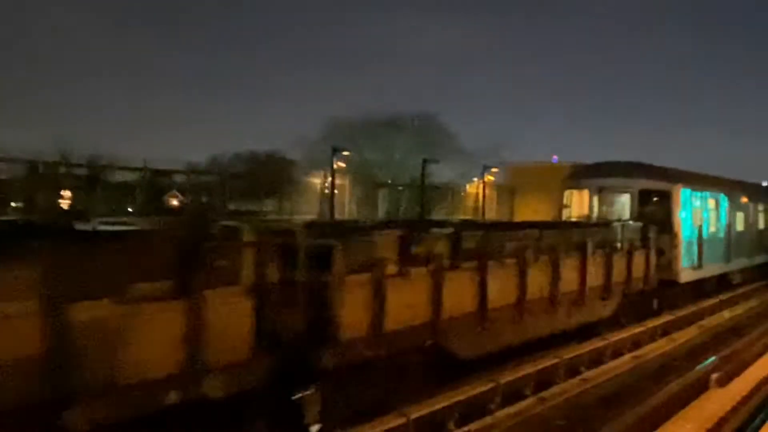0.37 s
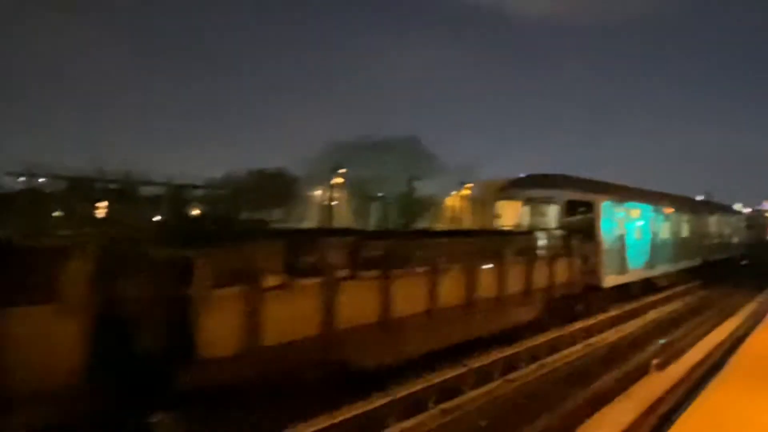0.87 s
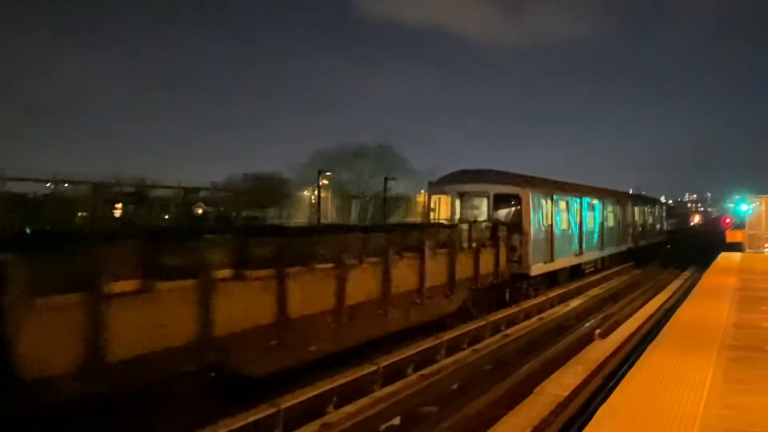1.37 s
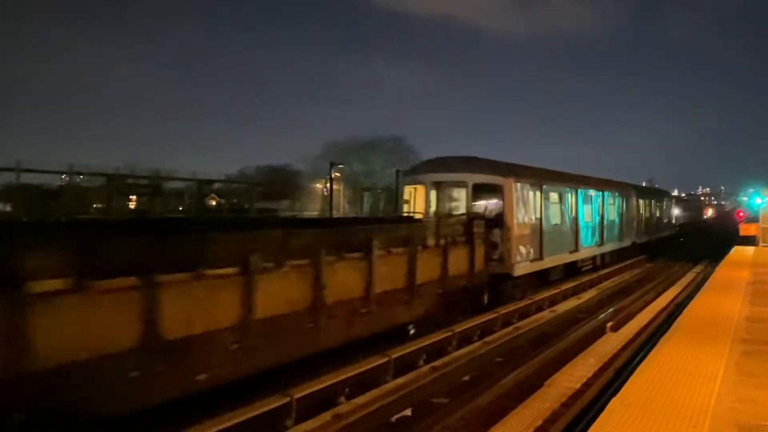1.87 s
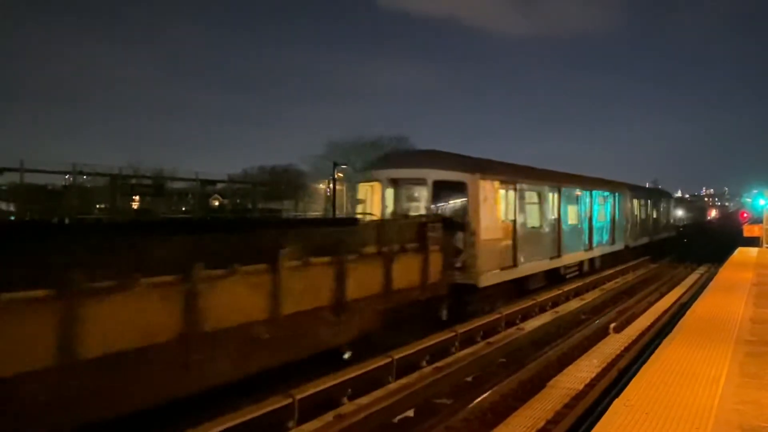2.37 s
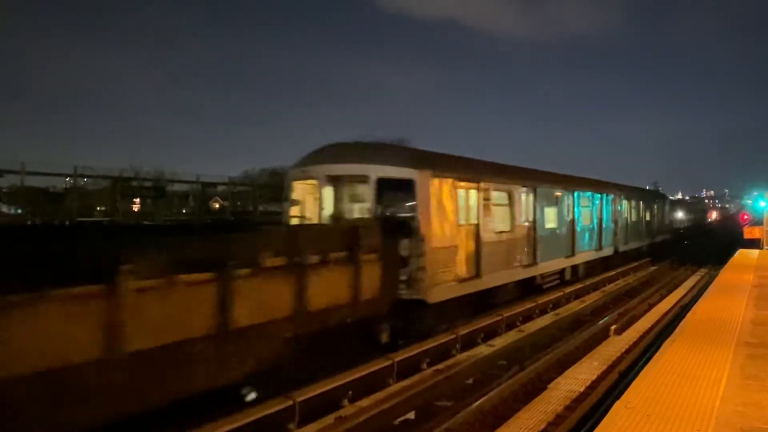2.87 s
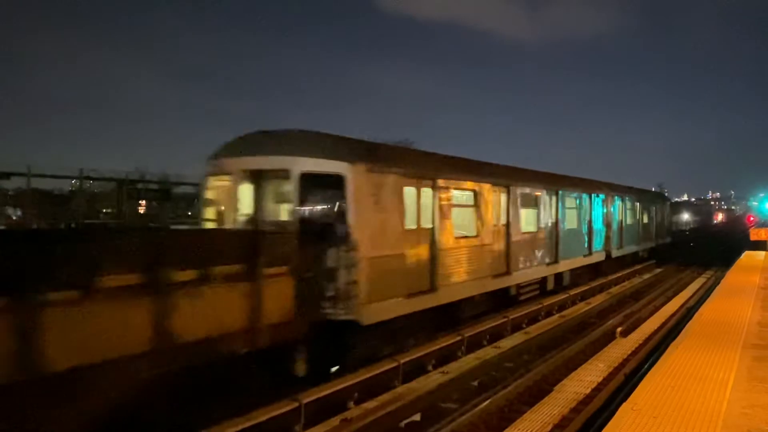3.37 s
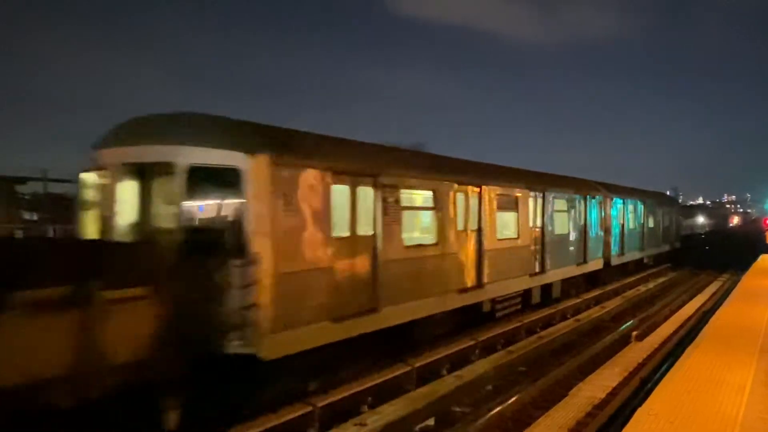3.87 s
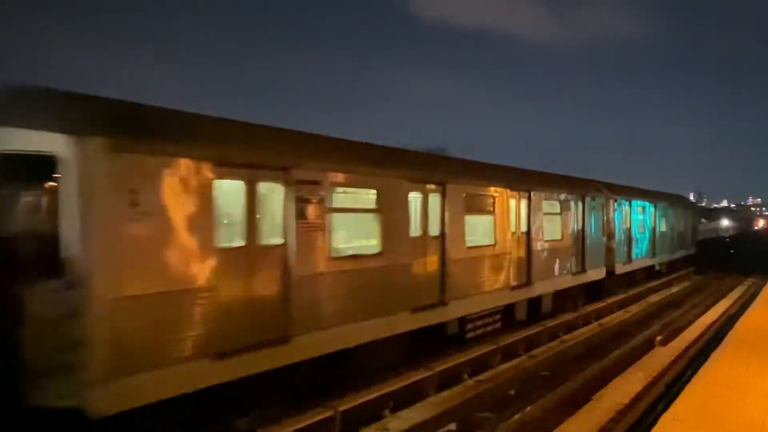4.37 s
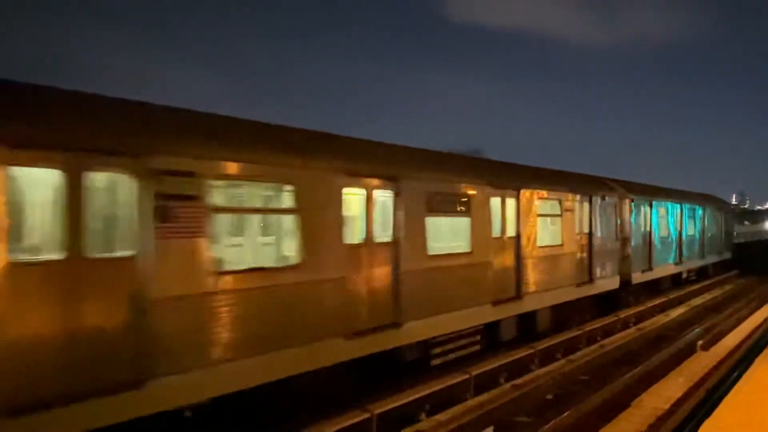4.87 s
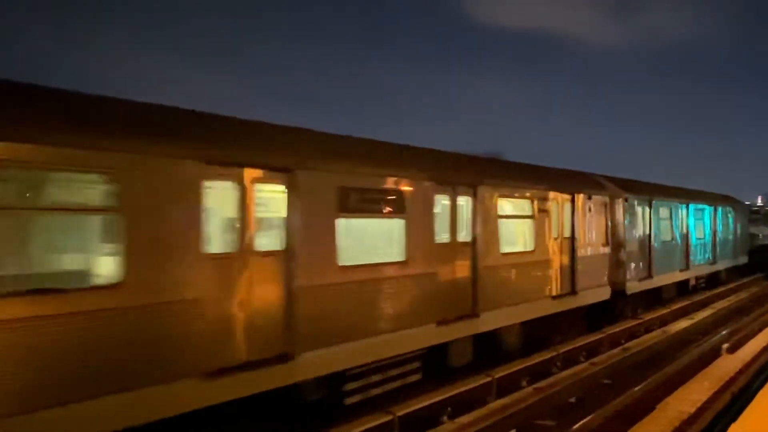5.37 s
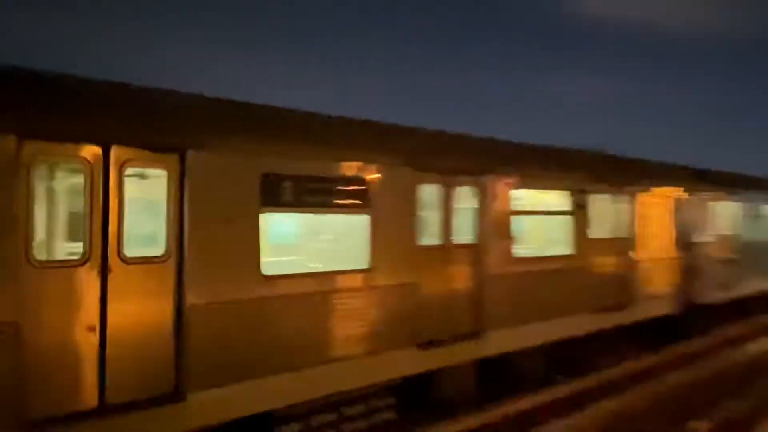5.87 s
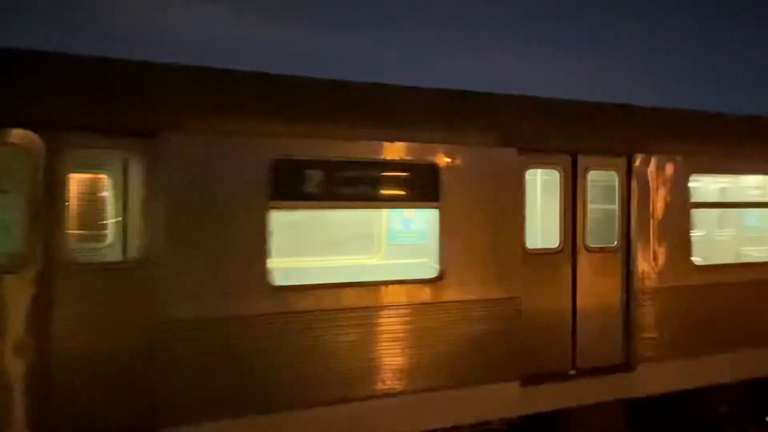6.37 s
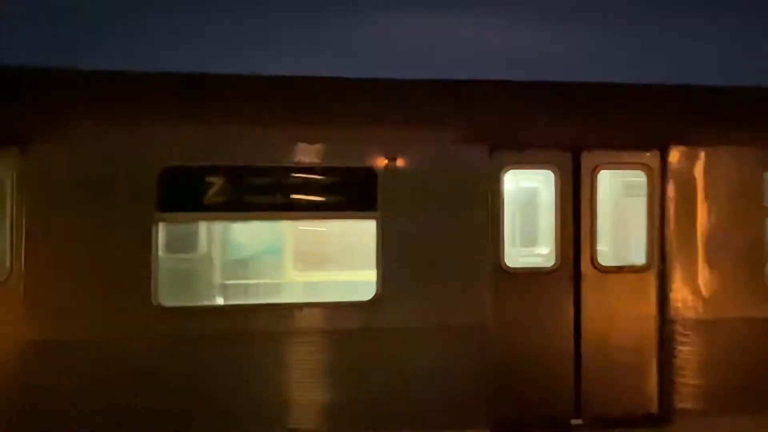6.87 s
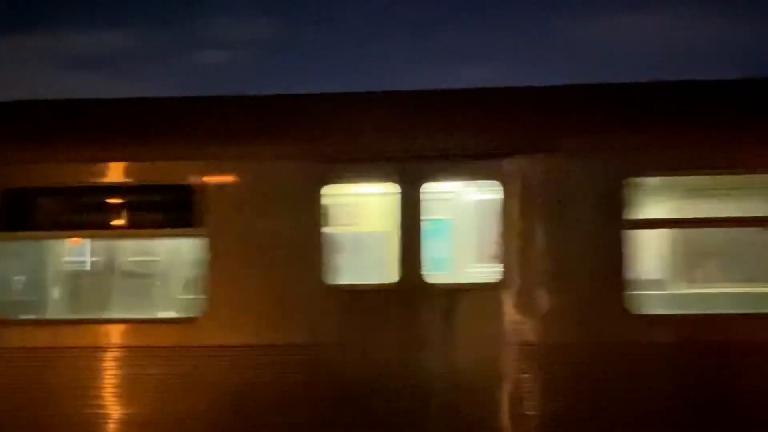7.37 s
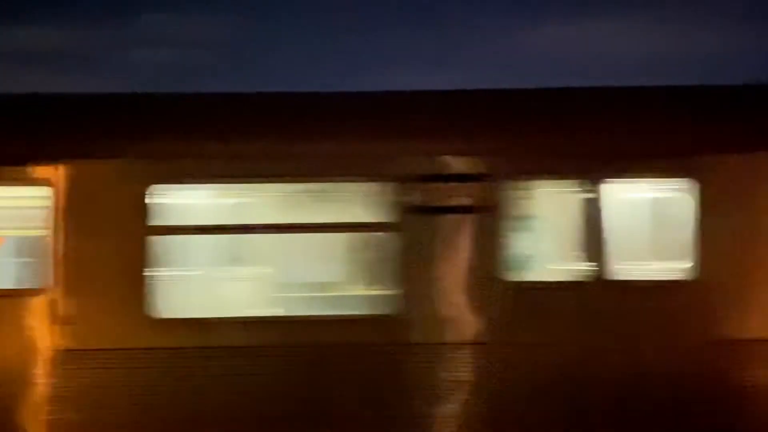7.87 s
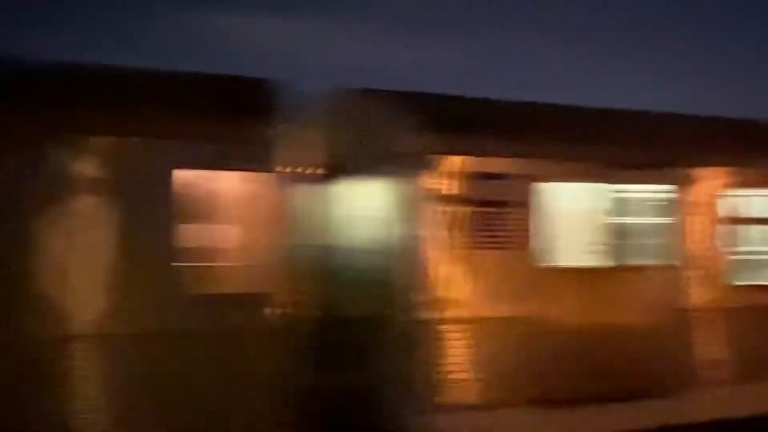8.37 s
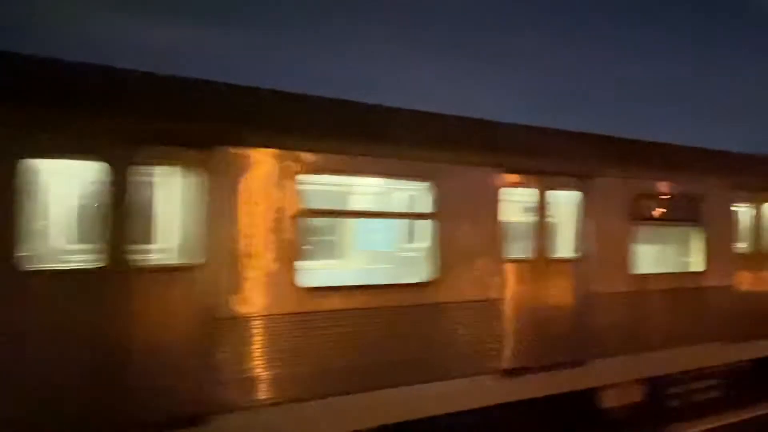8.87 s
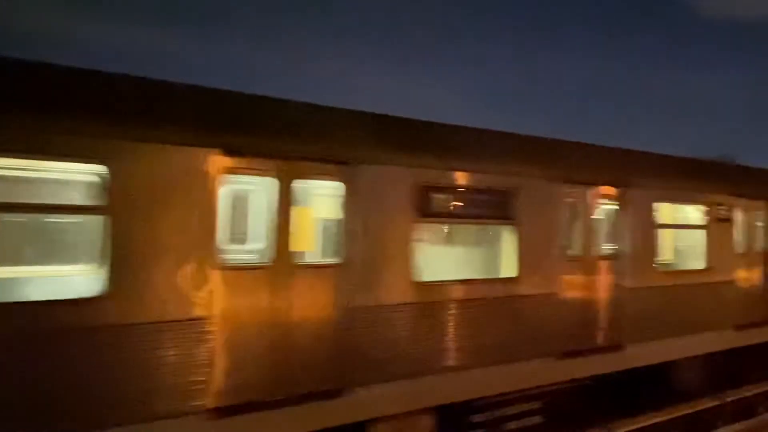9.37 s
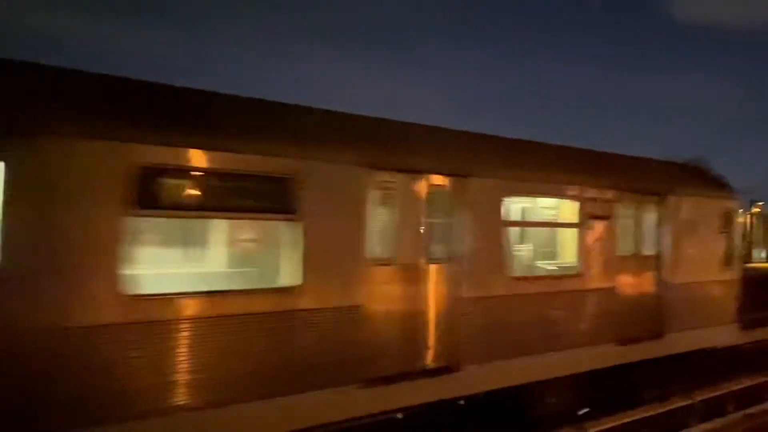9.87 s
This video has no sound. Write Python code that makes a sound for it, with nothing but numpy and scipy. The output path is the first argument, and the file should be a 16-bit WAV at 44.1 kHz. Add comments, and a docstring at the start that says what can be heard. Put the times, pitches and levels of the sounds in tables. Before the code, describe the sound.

A metro train passes an open elevated platform, heard from a handheld stereo microphone. Low girder rumble, mid-range rail roar and faint wheel hiss run throughout, gently swelling and easing. Axles strike rail joints in uneven clusters of thuds, knocks and short rattles that decay in the steelwork, with sharper ticks and very brief wheel chirps here and there. The train is still passing at the end.

```python
"""A steel-wheeled train rolls past on an elevated track, heard from the platform at a handheld pair of ports.
From the first moment to the last, girders rumble, rails roar and wheels hiss: filtered noise, slowly swelling.
From about 0.3 s on, axles crossing joints set off short clatters, noise that dies away in the steelwork and stirs
the rail web, with distinct knocks, clusters of decaying sines, among them. Now and then, from 0.36 to 9.3 s,
a struck wheel sings one brief wavering sine."""
import sys
import numpy as np
from scipy import signal
from scipy.fft import rfft, irfft, next_fast_len
from scipy.io import wavfile
from scipy.ndimage import uniform_filter1d, map_coordinates

SR = 44100
rng = np.random.default_rng(int(sys.argv[2]) if len(sys.argv) > 2 else 0)


def nominal_scale(level):
    """Amplitude ratio for a level in decibels (scalar or array-like)."""
    x = np.asarray(level, float) / 20
    return 10 ** x


def unload_wav(signal):
    """Save mono or channel-first audio to the path in sys.argv[1] as 16-bit WAV at rate SR, clipped to [-1, 1]."""
    wavfile.write(
        sys.argv[1],
        SR,
        np.round(np.clip(np.atleast_2d(signal).T, -1, 1) * 32767).astype(np.int16),
    )


N = 440559

# blows of axles on joints and of slack parts:
# (time [s], clatter level [dB], thud re clatter [dB], sizzle re clatter [dB])
BLOWS = [(.268, -18, 7.5, -29), (0.314, -13.5, 6, -26), (.34, -33, -8, -31), (.583, -23.5, 11, -29),
         (.641, -22.5, 6, -27), (.779, -15.5, 0.5, -25), (.838, -22, 10.5, -28), (1.093, -28, -8, -30),
         (1.212, -20.5, 8, -26), (1.279, -19, 3, -26), (1.349, -18.5, 8.5, -25), (1.543, -29, 19, -29),
         (1.627, -21.5, -9, -27), (1.69, -19, 1, -24), (1.807, -22, 1, -25), (1.859, -31, 13, -28),
         (2.008, -18.5, 5.5, -25), (2.059, -28, -2, -27), (2.305, -22.5, -2, -27), (2.424, -25, 4, -29),
         (2.595, -18, -10, -23), (2.679, -23.5, -20, -25), (2.898, -18.5, 5, -28), (2.959, -25, -7, -21),
         (3.297, -30, 19, -29), (3.34, -18.5, 7, -35), (3.362, -16.5, -6, -23), (3.41, -27, -10, -16),
         (3.525, -30, 10, -31), (3.665, -21, 11, -34), (3.68, -18.5, -10, -19), (3.729, -26, -7, -18),
         (3.84, -21.5, 8, -26), (4.215, -19, 8.5, -26), (4.236, -26, -1, -21), (4.36, -33, 19, -29),
         (4.424, -26.5, -1, -22), (4.62, -22, 9, -30), (4.7, -18.5, 5.5, -20.5), (4.797, -29, 9, -18),
         (5.03, -22, 7, -20), (5.093, -21.5, 1, -24), (5.589, -21, 6.5, -22), (5.65, -30, -2, -30),
         (5.969, -23, 12.5, -24), (5.993, -19.5, 2, -21), (6.06, -23.5, -12, -16), (6.31, -27.5, 13, -25),
         (6.53, -24, 14.5, -21), (6.87, -16.5, 5.5, -25), (6.909, -19, 4, -20), (6.957, -16, 7, -25),
         (6.979, -29, -2, -29), (7.02, -25, 10, -26), (7.151, -26, 2, -27), (7.298, -21, 8.5, -25),
         (7.346, -23, -5, -23), (7.399, -31, 4, -23), (7.757, -23.5, 6, -28), (7.834, -19, 10.5, -25),
         (8.06, -24.5, 6, -25), (8.174, -25, 11, -26), (8.256, -18, 9, -26), (8.328, -21, 6, -21),
         (8.407, -26, 9, -21), (8.697, -21, 9, -21), (8.806, -36, 3, -13), (9.257, -17.5, 7, -22.5),
         (9.329, -31, -10, -16), (9.594, -23.5, 6.5, -29), (9.675, -20, 9, -20), (9.73, -21.5, -17, -20)]


def along(points, hz):
    """Interpolation on a logarithmic frequency axis of (frequency [Hz], value) points."""
    f, v = np.transpose(points)
    return np.interp(np.log(hz + 1), np.log(f + 1), v)


def level_db(rows):
    """Linear interpolation in time: one dB value per sample for each column after the time."""
    s, *levels = np.transpose(rows)
    return [np.interp(np.arange(N) / SR, s, db) for db in levels]


def unit(x):
    """Normalization to an rms value of 1."""
    return x / np.sqrt(np.mean(x ** 2))


def wobble(rate):
    """Band-limited random modulation: a smooth curve through random knots, rate of them a second."""
    knots = rng.standard_normal(N // 100)
    return map_coordinates(knots, [np.arange(N) * rate / SR])


def filtered(x, response):
    """Linear filtering: the spectrum of x times a response of frequency."""
    m = next_fast_len(N + SR // 4)
    hz = np.fft.rfftfreq(m, 1 / SR)
    return irfft(rfft(x, m) * response(hz), m)[..., :N]


def rush(spectrum, grit_db, grit_rate):
    """Roughness excitation: two unrelated coloured noises, modulated alike by the bumps of the rail head."""
    bumps = nominal_scale(grit_db * wobble(grit_rate))
    rough = bumps * rng.standard_normal((2, N))
    return unit(filtered(rough, lambda hz: nominal_scale(along(spectrum, hz))))


def rolling():
    """Rolling noise: rough wheels on rough rails shake girders, rails and wheel discs, each swelling on its own."""
    # rolling noise: (time [s], girder rumble [dB], rail roar [dB])
    roll_levels = [(0, -9, -22), (.5, -17.5, -21), (.85, -13, -22), (1.3, -13.5, -20.5),
                   (1.85, -10.5, -17.5), (2.3, -13.5, -21), (2.9, -11, -19.5), (3.3, -11.5, -23),
                   (3.7, -15.5, -22), (3.87, -11, -21.5), (4.1, -13.5, -23), (5.2, -15, -22),
                   (6.2, -16.5, -20.5), (6.7, -16, -24), (7.3, -13.5, -20.5), (7.65, -17, -23),
                   (8.4, -15.5, -22), (9, -16, -25), (9.5, -18, -22.5), (9.99, -15, -25.5)]
    # rolling noise between blows: (time [s], rail web whoosh [dB], wheel hiss [dB])
    whoosh_levels = [(0, -29.5, -37), (.3, -40, -44.5), (.8, -30.5, -39), (1.15, -35.5, -40),
                     (1.83, -28.5, -37), (2.17, -33, -40.5), (2.95, -32, -40), (3.15, -34.5, -43.5),
                     (3.7, -36.5, -42), (4.5, -36.5, -44), (4.8, -31, -36.5), (5.3, -34.5, -41),
                     (6.1, -33.5, -40.5), (6.7, -34.5, -40), (7.3, -41, -39), (7.7, -39, -41),
                     (8.4, -32.5, -39), (8.9, -33, -41), (9.4, -35.5, -42), (9.99, -38, -44.5)]
    # spectral shape of the girders' rumble: (frequency [Hz], relative density [dB])
    girder_shape = [(20, -36), (32, -16), (45, -3.5), (65, 1.5), (100, -3), (160, -7), (220, -13),
                    (500, -25), (1000, -64.5)]
    # spectral shape of the rails' roar: (frequency [Hz], relative density [dB])
    rail_shape = [(80, -38), (150, -4), (220, -1), (370, -4), (430, -9), (580, -10.5), (800, -11),
                  (1000, -16.5), (1500, -19.5), (2500, -31), (5000, -58)]
    # spectral shape of the rail web's whoosh: (frequency [Hz], relative density [dB])
    web_shape = [(700, -23), (1100, -3.5), (1600, 5), (2000, -2.5), (2300, -5), (2650, -8), (2850, -12.5),
                 (3300, -11.5), (5000, -43)]
    # spectral shape of the web's rasping band: (frequency [Hz], relative density [dB])
    rasp_shape = [(1200, -30), (1800, -4.5), (2200, -0.5), (2650, -1.5), (3000, -12), (4000, -39)]
    # spectral shape of the wheel discs' hiss: (frequency [Hz], relative density [dB])
    wheel_shape = [(1000, -28), (2000, -6.5), (3300, -0.5), (4500, -2), (5600, -7), (7500, -8),
                   (10000, -13), (12500, -22), (16000, -22)]
    swell_db = 1.2
    rasp_db, plain_db = -6, -1.5  # the whoosh in and beside the rasping band

    rumble_db, roar_db = level_db(roll_levels)
    whoosh_db, hiss_db = level_db(whoosh_levels)
    girders = nominal_scale(rumble_db) * rush(girder_shape, grit_db=1.45, grit_rate=8.3)
    roar = nominal_scale(roar_db + swell_db * wobble(6)) * rush(rail_shape, grit_db=1.0, grit_rate=40)

    web = nominal_scale(whoosh_db + swell_db * wobble(6))
    # rolling and blows are unrelated, so their powers add
    rasp_level = np.sqrt((nominal_scale(rasp_db) * web) ** 2 + web_ringing())
    rasp = rasp_level * rush(rasp_shape, grit_db=1.5, grit_rate=45)
    whoosh = rasp + nominal_scale(plain_db) * web * rush(web_shape, grit_db=2.0, grit_rate=25)

    wheels = nominal_scale(hiss_db + 1.0 * wobble(11)) * rush(wheel_shape, grit_db=0.73, grit_rate=55)
    return girders + mottled(roar + whoosh + wheels, patchy_db=1.93)


def web_ringing():
    """Reverberant energy: each blow stirs the rail web, whose power builds up and decays exponentially."""
    stir_db = -15.5  # re clatter
    rise_s, t60_s = 0.027, 0.69
    blows, t = np.zeros(N), np.arange(SR) / SR
    for s, db, *_ in BLOWS:
        blows[round(s * SR)] += nominal_scale(db + stir_db) ** 2
    ring = ((1 - np.exp(-t / rise_s)) * nominal_scale(-60 * t / t60_s)) ** 2
    return np.abs(signal.fftconvolve(blows, ring)[:N])


def mottled(x, patchy_db):
    """Modal response: narrow resonances of the steel come and go as the wheels move along it."""
    z = signal.stft(x, nperseg=1024)[2]
    field = rng.standard_normal(z.shape[1:])
    field = uniform_filter1d(field, size=3, axis=0)  # over frequency
    field = uniform_filter1d(field, size=5, axis=1)  # over time
    return signal.istft(z * nominal_scale(patchy_db * unit(field) - 1), nperseg=1024)[1][:, :N]


def clatter():
    """Impact and damping: a blow shakes loose steel for a moment, then each frequency decays at its own speed."""
    # damping of the steelwork: (frequency [Hz], time to fall 60 dB [s])
    steel_t60 = [(300, 0.5), (1000, 0.45), (3000, 0.47), (8000, 0.41), (15000, 0.25)]
    # spectral shape of the clatter: (frequency [Hz], relative level [dB])
    clatter_shape = [(100, 5), (300, 14), (700, 4.5), (1500, 7), (2500, 0.5), (3500, -4.5), (4600, -4),
                     (5600, -12), (7500, -0.5), (11000, 6), (13000, 9.5), (16000, 11)]
    rattle_db = 1.7
    shake_s = 0.039  # decay starts this long after the blow
    top_db = -7.5  # highest treble re sizzle

    loose = nominal_scale(rattle_db * wobble(120))  # parts rattle in quick uneven contacts
    hz, t, z = signal.stft(loose * rng.standard_normal((2, N)), SR, nperseg=256, noverlap=192)
    power = np.zeros(z.shape[1:])
    fall_db = 60 / along(steel_t60, hz)[:, None]  # per second
    rise = along([(500, 0.0023), (3000, 0.0066), (10000, 0.0018)], hz)[:, None]  # (Hz, s)
    for s, db, thud_db, sizzle_db in BLOWS:
        near = (t > s) & (t < s + .4)
        age = t[near] - s
        colour = [(700, thud_db), (2000, 0), (6000, 0), (11000, sizzle_db), (15000, sizzle_db + top_db)]
        colour_db = along(colour, hz)[:, None]
        decay_db = fall_db * np.maximum(age - shake_s, 0)
        power[:, near] += ((1 - np.exp(-age / rise)) * nominal_scale(db + colour_db - decay_db)) ** 2
    shaken = z * np.sqrt(power) * nominal_scale(along(clatter_shape, hz) - 4.5)[:, None]
    return signal.istft(shaken, SR, nperseg=256, noverlap=192)[1][:, :N]


def knocks():
    """Modal clusters: a hard contact rings close steel modes about a pitch, differing from blow to blow."""
    # distinct knocks and ticks inside the clatter: (time [s], nominal peak level [dB], pitch [Hz])
    knock_list = [(0.276, -26, 11100), (.318, -11, 916), (.35, -19, 4400), (.642, -3, 598),
                  (1.005, -22, 500), (1.55, -13, 710), (1.859, -3, 438), (2.303, -6.5, 600),
                  (2.425, -8.5, 690), (2.52, -4, 352), (2.68, -3, 400), (3.296, -13, 818),
                  (3.345, -15, 1270), (3.364, -26, 11000), (3.412, -21, 13500), (3.684, -27, 12400),
                  (3.73, -19, 13100), (3.891, -2, 458), (4.223, -10, 1470), (4.359, -2.5, 444),
                  (4.626, -8, 1090), (5.592, -15, 700), (5.998, -16, 820), (6.544, -19, 3470),
                  (6.76, -29, 8500), (6.777, -28, 8500), (6.856, -21, 1750), (6.878, -19, 1500),
                  (6.908, -12, 3790), (6.912, -26, 11100), (6.957, -6, 770), (6.982, -18, 3590),
                  (7.153, -29, 8700), (7.846, -11, 1240), (8.185, -23, 844), (8.257, -22, 2420),
                  (8.26, -7.5, 1000), (8.70, -16, 696), (9.263, -16, 530), (9.684, -10, 637)]
    # damping of the struck modes: (pitch [Hz], time to fall 60 dB [s])
    knock_t60 = [(500, .07), (3000, .05), (10000, .035)]
    rise_s = 0.00044

    out, t = np.zeros((2, N + SR)), np.arange(SR // 14) / SR
    spread = rng.standard_normal((len(knock_list), 2, 30, 1))  # 30 modes in each of two channels
    for (s, db, hz), apart in zip(knock_list, spread):
        mode_hz = np.minimum(hz * 2 ** (.4 * apart), 16000)
        modes = np.sin(2 * np.pi * mode_hz * (t + .002 * apart))
        cluster = modes.sum(axis=1) / 10.4
        envelope = nominal_scale(db - 60 * t / along(knock_t60, hz)) * (1 - np.exp(-t / rise_s))
        start = round(s * SR)
        out[:, start:start + len(t)] += envelope * cluster
    return out[:, :N]


def singing():
    """Lightly damped resonance: a struck wheel holds one note, unsteady in level and phase, for a moment."""
    # singing wheels: (start [s], length [s], frequency [Hz], nominal rms level [dB])
    notes = [(.355, .095, 7321, -48), (1.79, .1, 7321, -46), (4.225, .035, 1470, -29),
             (4.27, .04, 3435, -46), (4.64, .06, 3430, -38), (6.89, .05, 3500, -40), (7.3, .1, 3515, -41),
             (7.855, .08, 3435, -40), (8.28, .06, 3440, -42), (9.27, .06, 3430, -44)]
    t = np.arange(N) / SR
    flutter_db, waver = 3 * wobble(80), 1.1 * wobble(120)  # waver in radians
    out = np.zeros(N)
    for start, length, hz, db in notes:
        fade_in = np.clip((t - start) / .006, 0, 1)
        fade_out = np.clip((start + length - t) / .025, 0, 1)
        tone = np.sqrt(2) * np.sin(2 * np.pi * hz * t + waver)
        out += nominal_scale(db + flutter_db) * fade_in * fade_out * tone
    return out


def scene():
    """Partial coherence: a shared part is alike at both ports, an unshared part opposite in sign."""
    # coherence of the ports: (frequency [Hz], likeness [1 = identical])
    likeness = [(60, .95), (250, .84), (550, .48), (1100, .35), (1500, .5), (1900, .2), (2400, .9),
                (3300, .9), (4000, .98), (8000, .86), (14000, .8)]
    common, apart = rolling() + clatter() + knocks()

    def turn(hz):
        return np.arccos(np.clip(along(likeness, hz), 0, 1)) / 2

    common = filtered(common, lambda hz: np.cos(turn(hz))) + singing()
    apart = filtered(apart, lambda hz: np.sin(turn(hz)))
    return np.array([common + apart, common - apart])


def ports_apart(dry):
    """Interaural-like differences: the ports differ in level and phase, and the left treble arrives late."""
    # phase between the ports below the late treble: (frequency [Hz], left lead [rad])
    left_lead = [(100, 0), (600, .7), (1350, 2.4), (1850, 2), (2100, 0), (3200, .25), (4000, 0)]
    # level between the ports: (frequency [Hz], left over right [dB])
    left_bias = [(60, .5), (380, 1.5), (700, 3.6), (1000, .3), (1400, -2.5), (1900, .3), (3300, .8),
                 (4400, 0)]
    lag_s, lag_from_hz = .000232, 6780

    def half(hz):
        lead = along(left_lead, hz) - 2 * np.pi * lag_s * np.maximum(hz - lag_from_hz, 0)
        return nominal_scale(along(left_bias, hz) / 2) * np.exp(.5j * lead)

    return filtered(dry, lambda hz: np.array([half(hz), 1 / half(hz)]))


def joint_stereo(left, right):
    """Sum and difference decomposition: band by band and frame by frame, the much weaker one is dropped."""
    # limit for keeping the difference: (frequency [Hz], level re sum [dB])
    difference_limit = [(1500, -40), (2400, -17), (3400, -13), (4200, -7), (7500, -4), (15000, -2.5)]
    # limit for keeping the sum: (frequency [Hz], level re difference [dB])
    sum_limit = [(7000, -30), (8400, -6), (13000, -4.5)]
    top_hz = 15800  # nothing is kept above

    pair = np.array([left + right, left - right]) / 2
    hz, _, z = signal.stft(pair, SR, nperseg=2048)
    band = np.arange(len(hz)) // 16
    total, differ = np.add.reduceat(np.abs(z), np.arange(0, len(hz), 16), axis=1)[:, band]
    keep_sum = total > differ * nominal_scale(along(sum_limit, hz))[:, None]
    keep_difference = differ > total * nominal_scale(along(difference_limit, hz))[:, None]
    kept = z * [keep_sum, keep_difference] * (hz < top_hz)[:, None]
    total, differ = signal.istft(kept, SR, nperseg=2048)[1][:, :N]
    return np.array([total + differ, total - differ])


def low_pass(x):
    """Removes everything above the highest recorded frequency."""
    return signal.sosfilt(signal.butter(12, 16660, fs=SR, output="sos"), x)


def record(dry):
    """Soft saturation: loud peaks at the two ports are rounded off, before sum and difference are thinned."""
    ports = ports_apart(dry)
    rounded = ports / (1 + np.abs(ports / .97) ** 6) ** (1 / 6)
    mix = joint_stereo(*rounded)
    return low_pass(mix)


dry = scene()
out = record(dry)
unload_wav(out)
```